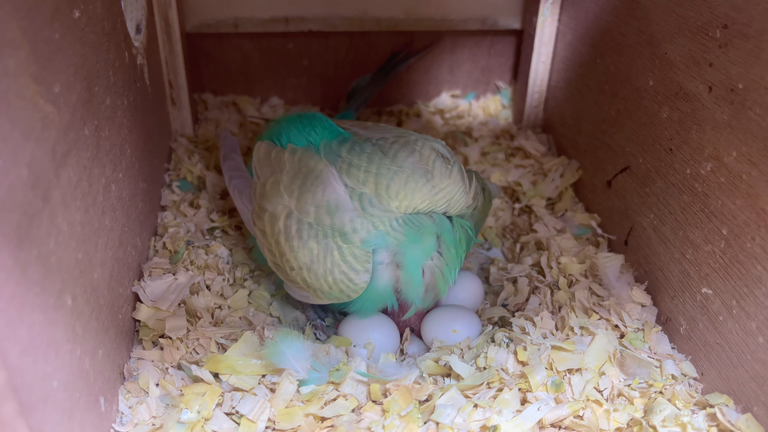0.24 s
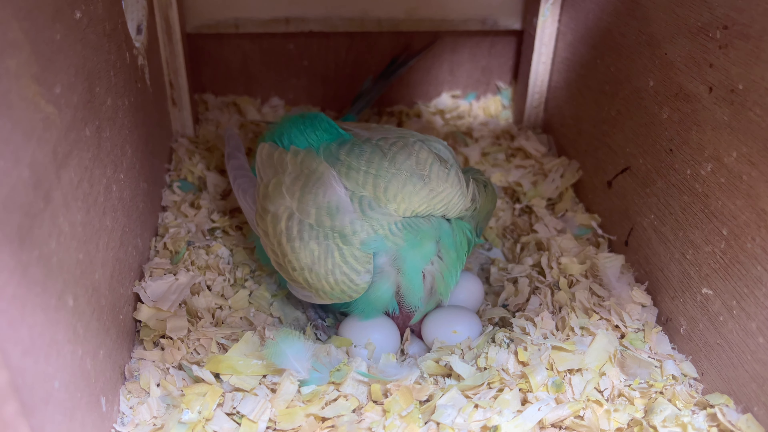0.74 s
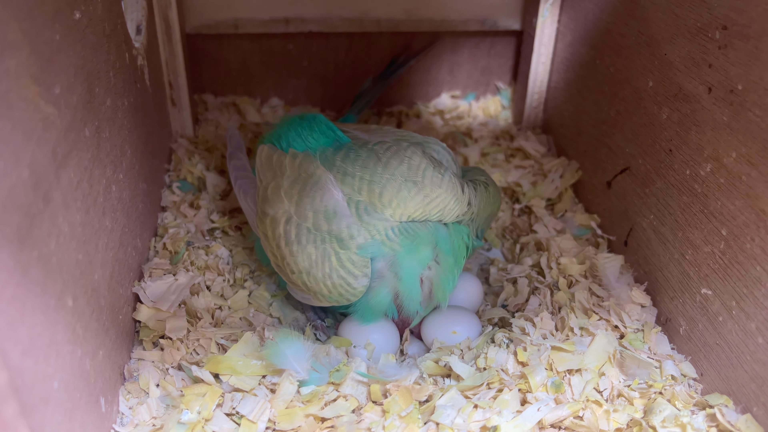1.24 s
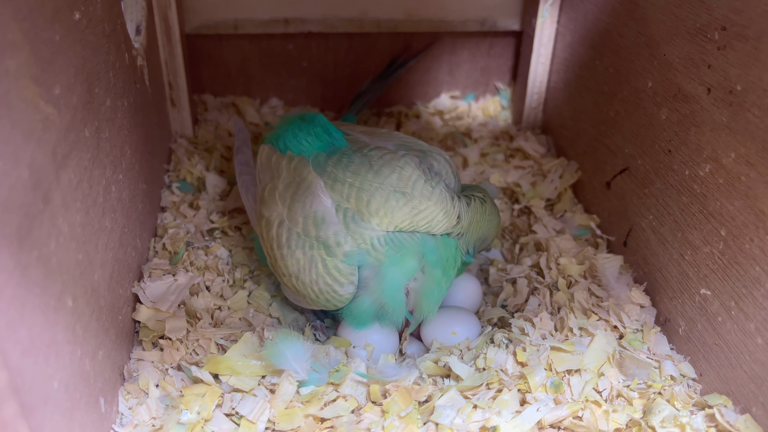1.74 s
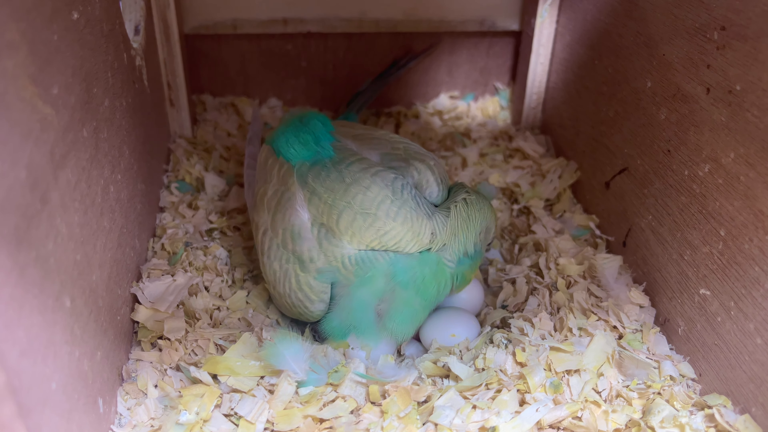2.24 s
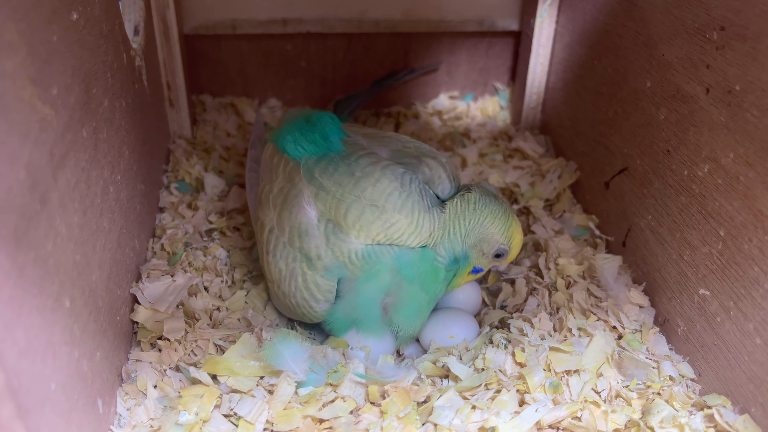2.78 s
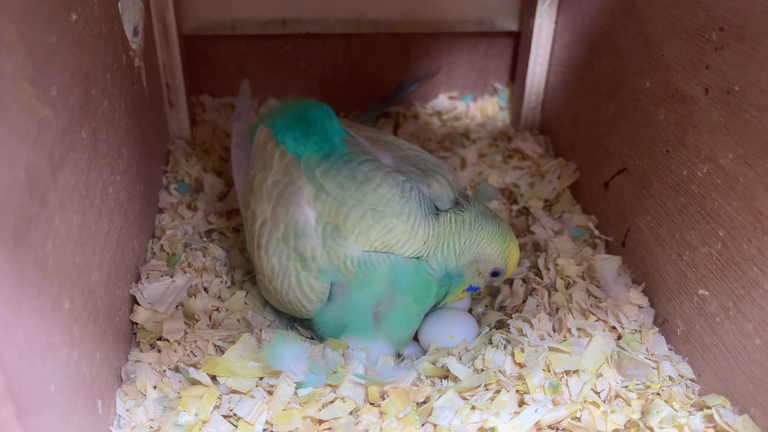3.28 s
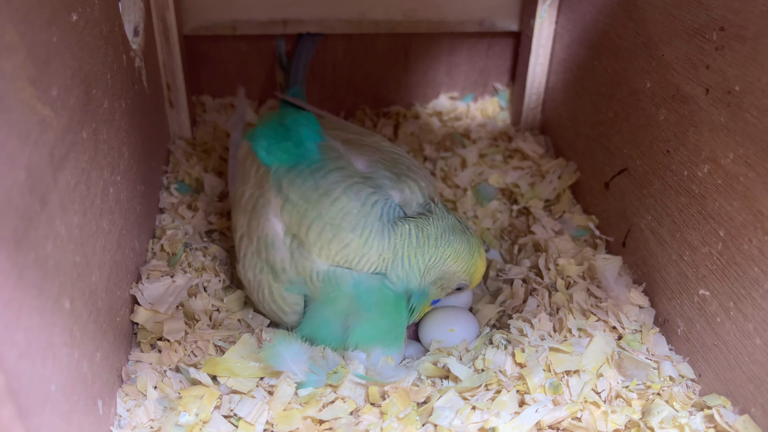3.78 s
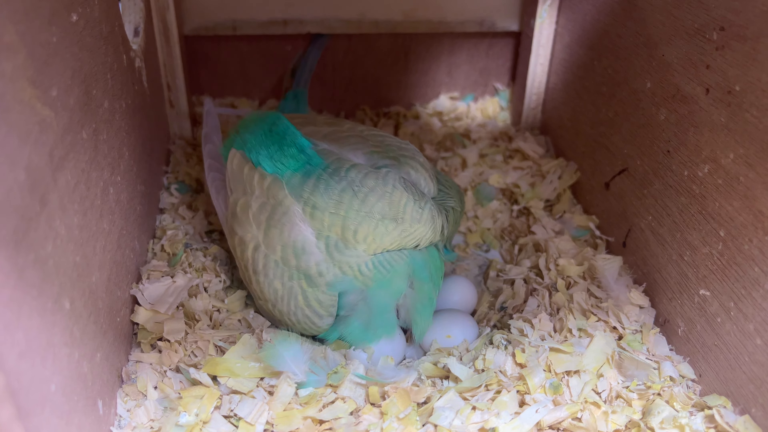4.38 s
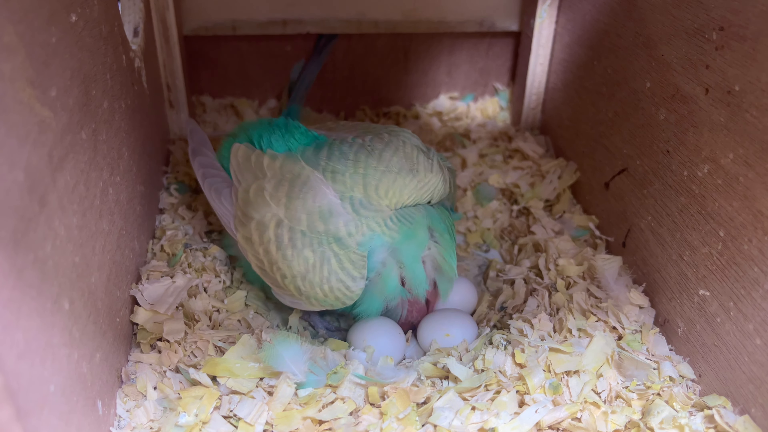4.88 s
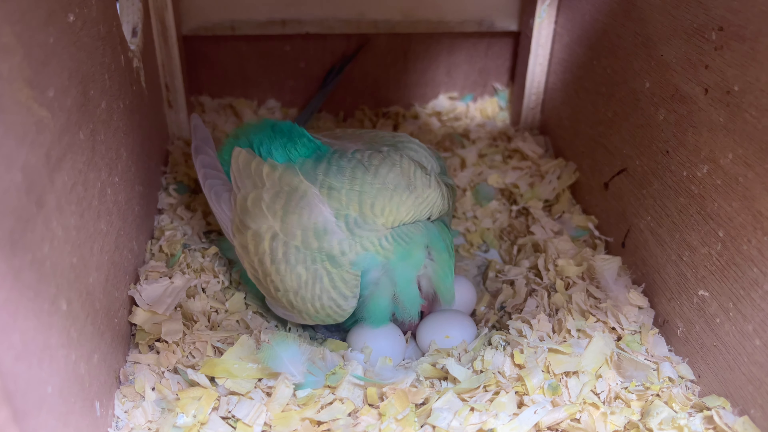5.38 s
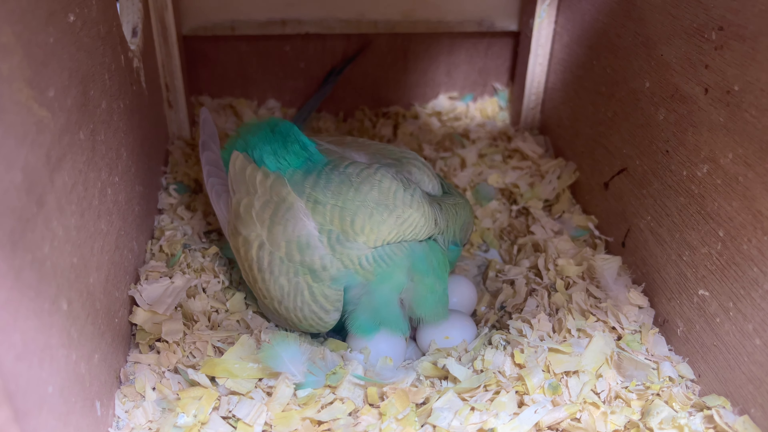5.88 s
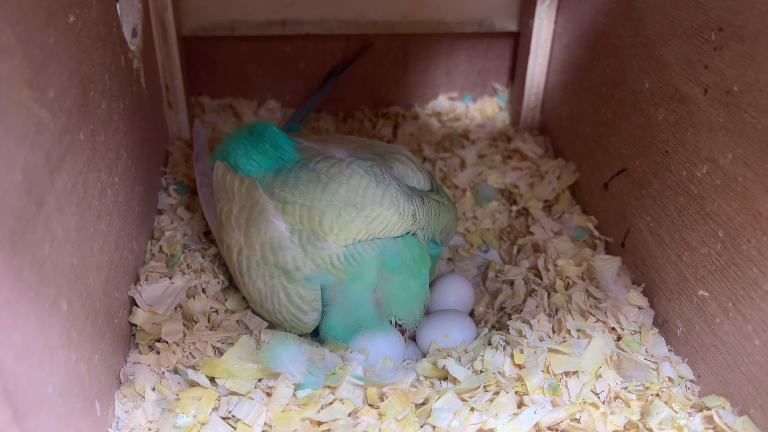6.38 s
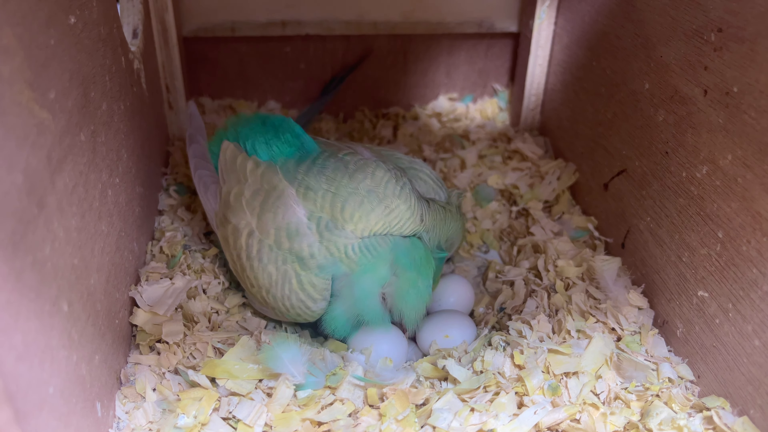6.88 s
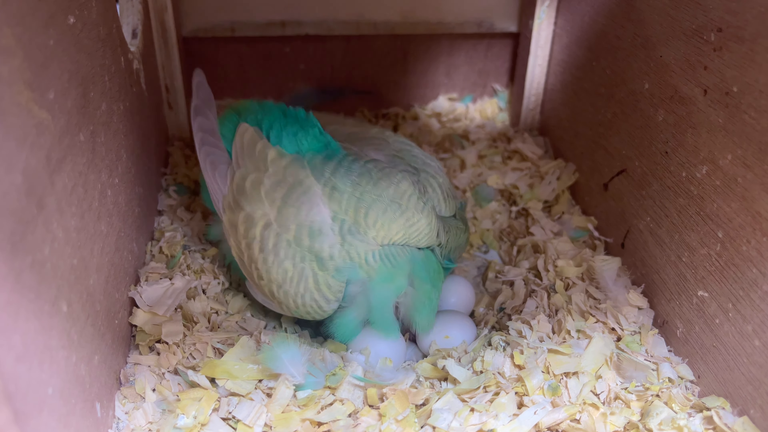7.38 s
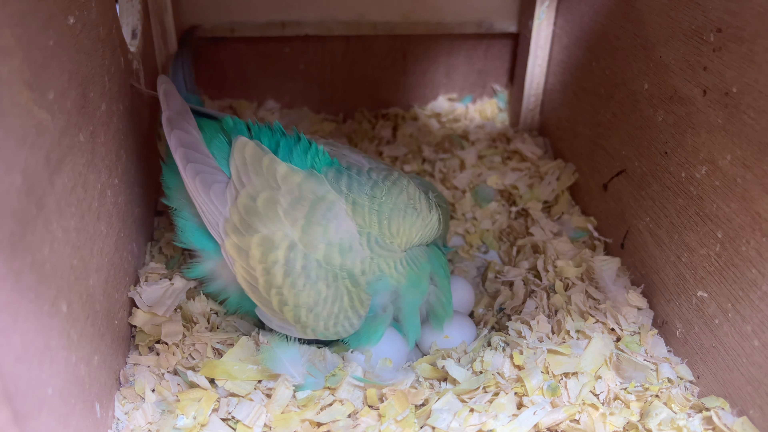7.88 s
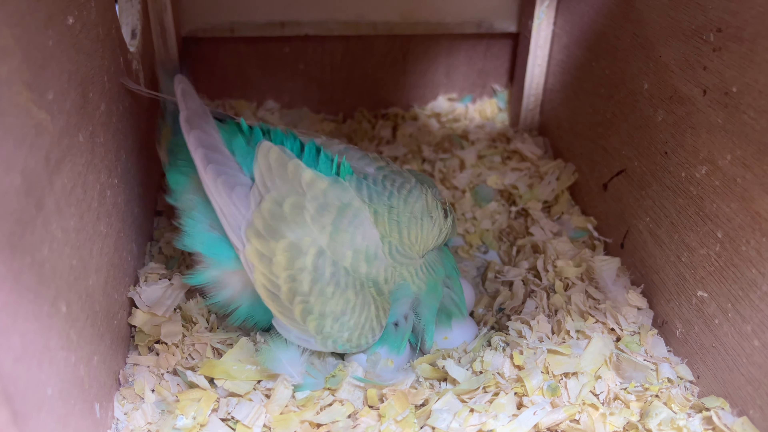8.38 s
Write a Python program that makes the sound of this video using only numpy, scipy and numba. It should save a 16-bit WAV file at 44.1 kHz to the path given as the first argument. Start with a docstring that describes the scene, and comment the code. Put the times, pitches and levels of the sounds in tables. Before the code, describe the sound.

Close stereo pickup inside a small wooden nest box: a small parrot scolds in rough, bright, nasal bursts while its movements make low shakes, wooden taps and scratchy shavings. Other birds whistle, chatter and peep faintly around it, with short box and aviary echoes. Two busy bouts of squawking are separated by a quiet pause, and the end drops to soft chatter, dull thumps and a last low rumble.

```python
"""Budgie squawks in a wooden nest box

A budgie close by rasps a run of harsh squawks: pulses and hiss ring two moving throat resonances.
Other birds in the aviary whistle, chatter and peep, made from gliding tones with overtones and breath.
Feet and beak tap the wood: short pushes ring panel resonances. Shaped noise makes the rustling shavings,
the bouts of low rumble that shake the box and the quiet air. Tails of fading noise make the echoes."""
import sys
import numpy as np
from scipy import signal
from scipy.fft import rfft, irfft, next_fast_len
from scipy.io import wavfile
from scipy.ndimage import uniform_filter1d, map_coordinates
from numba import njit

SR = 44100
rng = np.random.default_rng(int(sys.argv[2]) if len(sys.argv) > 2 else 0)


def unload_wav(signal):
    """Save mono or channel-first audio to the path in sys.argv[1] as 16-bit WAV at rate SR, clipped to [-1, 1]."""
    wavfile.write(
        sys.argv[1],
        SR,
        np.round(np.clip(np.atleast_2d(signal).T, -1, 1) * 32767).astype(np.int16),
    )


N = 380583

# colour of breathy bird noise: (frequency [Hz], relative level per Hz [dB])
BREATH_COLOUR = [(800, -77), (1300, -18), (2300, -16), (3500, -7.5), (4350, -13), (5300, -5.5), (7600, -9),
                 (8700, -4.5), (9900, -13), (11000, -1.5), (12000, -12.5), (13000, -27.5), (15000, -38.5),
                 (16500, -54)]


def amp(db):
    """Turn decibels into a gain."""
    return 10 ** (np.asarray(db) / 20)


def unit(x):
    """Scale x to an rms (average strength) of 1."""
    return x / np.sqrt(np.mean(x ** 2) + 1e-20)


def along(points, hz):
    """Read a curve of (frequency, value) points on a log frequency axis."""
    f, v = np.transpose(points)
    return np.interp(np.log(hz + 1), np.log(f + 1), v)


def curves(rows):
    """Give one value per sample for each column after the time."""
    s, *cols = np.transpose(rows)
    return [np.interp(np.arange(N) / SR, s, c) for c in cols]


def contour(rows, shape):
    """Gain over time: each row's shape starts at its time and is read for 1 s; the loudest wins."""
    t = np.arange(N) / SR
    out = np.zeros(N)
    for s, *rest in rows:
        i = round(s * SR)
        part = out[i:i + SR]
        out[i:i + SR] = np.maximum(part, shape(t[:len(part)], *rest))
    return out


def sounding(t0, t1, fade):
    """Give 1 between two times and 0 outside, with soft edges."""
    t = np.arange(N) / SR
    return np.clip(np.minimum(t - t0, t1 - t) / fade, 0, 1)


def wobble(rate):
    """A smooth random curve with this many random points a second."""
    knots = rng.standard_normal(int(N * rate / SR) + 4)
    return map_coordinates(knots, [np.arange(N) * rate / SR])


def filtered(x, response):
    """Change the strength and phase of x by a response that depends on frequency."""
    m = next_fast_len(N + SR // 2)
    return irfft(rfft(x, m) * response(np.fft.rfftfreq(m, 1 / SR)), m)[..., :N]


def steady(x):
    """Even out x to an rms of 1 over about every 30 ms."""
    return x / np.sqrt(np.abs(uniform_filter1d(x ** 2, size=1300)) + 1e-20)


def patchy(x, depth_db):
    """Give x random louder and softer patches in time and frequency."""
    z = signal.stft(x, nperseg=512)[2]
    field = uniform_filter1d(rng.standard_normal(z.shape[-2:]), size=6, axis=0)
    field = uniform_filter1d(field, size=8, axis=1)
    return signal.istft(z * amp(depth_db * unit(field)), nperseg=512)[1][..., :N]


def rush(spectrum, patchy_db):
    """Patchy coloured noise in two channels that share part of it, depending on frequency."""
    # (frequency [Hz], likeness of the two channels here, 1 = the same)
    likeness = [(60, 1), (250, 0.55), (1000, 0.033), (7000, 0.11), (9000, 0.93)]

    def colour(hz):
        angle = np.arccos(np.clip(along(likeness, hz), 0, 1)) / 2
        level = amp(along(spectrum, hz)) / (1 + (hz / 12500) ** 40)
        return level * [np.cos(angle), np.sin(angle)]

    mid, side = filtered(patchy(rng.standard_normal((2, N)), patchy_db), colour)
    return unit(np.array([mid + side, mid - side]))


def grains(often, size):
    """Smooth little bumps of random strength at random moments."""
    hits = (rng.random(N) < often) * rng.exponential(size=N)
    return np.convolve(hits, np.hanning(size), "same")


def quiet_air():
    """Steady soft noise, strongest in the bass."""
    # (frequency [Hz], relative level per Hz [dB])
    air_colour = [(30, -24.5), (95, -13.5), (118, 5), (145, -13), (267, -5), (571, -22.5), (1260, -14),
                  (1390, -15.5), (1750, -25), (1890, -23.5), (2490, -26.5), (4950, -35.5), (11700, -55.5),
                  (13000, -63.5)]
    return amp(-56) * rush(air_colour, patchy_db=4)


def aviary(x):
    """Echoes of box and aviary; each quarter second gets its own noise tail, as the birds move."""
    # (frequency [Hz], time for the aviary echo to fall by 60 dB [s])
    echo_times = [(500, 0.06), (3000, 0.26), (7000, 0.2), (13000, 0.011)]
    box_t60_s, aviary_db = 0.035, -8.5  # the aviary echo starts this far below the box echo
    out, step = np.zeros((2, N + SR)), SR // 4
    for i in range(0, N, step):
        hz, t, z = signal.stft(rng.standard_normal((2, SR // 4)), SR, nperseg=256)
        box_fade = amp(-60 * t / box_t60_s)
        aviary_fade = amp(aviary_db - 60 * t / along(echo_times, hz)[:, None])
        tail = signal.istft(z * (box_fade + aviary_fade), SR, nperseg=256)[1]
        wet = signal.fftconvolve(x[None, i:i + step], tail / np.linalg.norm(tail[0]), axes=1)
        out[:, i:i + wet.shape[1]] += wet
    return out[:, :N]


def rustle():
    """Shavings and the far flock: noise made grainy by random bumps."""
    # (time [s], relative level [dB])
    rustle_level = [(0.0, -69), (2.45, -46.5), (2.86, -59.5), (3.13, -46), (3.17, -35.5), (3.23, -42.5),
                    (3.27, -52.5), (3.68, -47.5), (4.95, -62.5), (5.53, -51), (5.74, -61.5), (6.32, -55.5),
                    (6.9, -53.5), (7.26, -41), (7.47, -33), (8.0, -63), (8.63, -50)]
    # (frequency [Hz], relative level per Hz [dB])
    rustle_colour = [(590, -13.5), (1000, -40.5), (1840, 1), (2100, -9.5), (2470, 1), (2950, -6),
                     (4110, -7), (5360, -5.5), (8610, -10.5), (10100, 3.5), (14000, -26.5)]
    noise = (1 + .5 * grains(.003, size=90)) * rush(rustle_colour, patchy_db=4)
    return amp(curves(rustle_level)[0] - 1.5) * unit(noise)


def rumble():
    """Shaking in bouts: the box booms at the bottom, its panels sound above, and shavings are stirred; a faint
    low hum also sounds at the start and near 4.6 s."""
    # bouts: (time [s], length [s], relative level [dB], panels relative to the boom [dB]); the faint rows at 0
    # s and 4.6 s are a low hum, not shaking
    bouts = [(0, 0.7, -58, 4), (1.323, 0.29, -34.5, -4), (1.688, 0.36, -34.5, -3), (1.893, 0.23, -29.5, -5),
             (2.123, 0.16, -32, -10.5), (2.43, 0.054, -35.5, -10), (2.972, 0.35, -38.5, 3.5),
             (3.419, 0.086, -38.5, -1.5), (3.979, 0.094, -47.5, -1.5), (4.6, 0.77, -56, 1),
             (5.128, 0.281, -49, 4), (5.885, 0.23, -46.5, 11.5), (7.084, 0.3, -37, 3.5),
             (7.654, 0.38, -35, -7), (8.464, 0.23, -35.5, -2)]
    # (frequency [Hz], relative level per Hz [dB])
    rumble_colour = [(30, 1), (58, 6.5), (85, 1), (140, -0.5), (244, -11.5), (419, -18.5), (470, -10),
                     (600, -26.5), (1100, -42.5), (1600, -120)]
    # stirred shavings: (frequency [Hz], relative level per Hz [dB])
    litter_colour = [(120, -20), (250, -8.5), (480, -5.5), (620, -5), (850, 3.5), (1100, -53.5)]
    rise_s, fade_db_per_s, calm_db, split_hz = 0.033, 295.5, -58, 67

    def bout(t, length, db):
        return np.clip(t / rise_s, 0, 1) * amp(db - fade_db_per_s * np.clip(t - length, 0, None))

    boom_rows = [(s, length, db) for s, length, db, _ in bouts]
    panel_rows = [(s, length, db + panel_db) for s, length, db, panel_db in bouts]
    boom_level = np.maximum(contour(boom_rows, bout), amp(calm_db))
    panel_level = np.maximum(contour(panel_rows, bout), amp(calm_db))
    noise = unit(amp(2.5 * wobble(25)) * rush(rumble_colour, patchy_db=1.5))
    deep = filtered(noise, lambda hz: 1 / (1 + (hz / split_hz) ** 6))
    crumbs = 1 + .5 * grains(.006, size=250)
    litter = amp(-17.5) * unit(crumbs * rush(litter_colour, patchy_db=4.0))
    return boom_level * deep + panel_level * (noise - deep) + panel_level * litter


def tone(hz, overtone_db, rough):
    """A whistle with a second harmonic; pitch and level flutter fast."""
    turn = 2 * np.pi * np.cumsum(hz * (1 + rough * wobble(300))) / SR
    return np.sqrt(2) * amp(3 * wobble(120)) * (np.sin(turn) + amp(overtone_db) * np.sin(2 * turn))


def peeps():
    """One small bird repeats a two-arched peep with a strong second harmonic; low notes are breathier."""
    # turning points of one peep's pitch: (time from the first crest [s], frequency [Hz])
    arches = np.array([(-.065, 4200), (-.031, 3650), (0, 5500), (.045, 3850), (.077, 5620), (.13, 2700)])
    # (first crest time [s], start and end from that crest [s], relative level [dB], relative breath [dB])
    peep_rows = [(0.467, -0.059, 0.15, -48.5, 2), (1.277, -0.057, 0.115, -51.5, 1),
                 (2.064, 0.048, 0.13, -60, -5), (2.982, -0.074, 0.0032, -56, 1.5),
                 (3.797, -0.034, 0.11, -50.5, 1), (4.643, -0.062, 0.14, -54, 4),
                 (6.267, -0.068, 0.051, -52, 7), (7.948, -0.046, 0.15, -52.5, 3.5)]
    s, turns_hz = np.vstack([arches + [p[0], 0] for p in peep_rows]).T
    place = np.interp(np.arange(N) / SR, s, np.arange(len(s)))
    eased = np.floor(place) + np.sin(np.pi / 2 * (place % 1)) ** 2  # half cosines join the points
    hz = np.interp(eased, np.arange(len(s)), turns_hz)
    level, airy, faded = np.zeros(N), np.zeros(N), np.zeros(N)
    for crest, begin, end, db, breath_db in peep_rows:
        level += amp(db) * sounding(crest + begin, crest + end, fade=0.016)
        airy += amp(breath_db) * sounding(crest - .1, crest + .2, fade=.01)
        # the tone fades between the arches and on the last fall
        faded += sounding(crest + .024, crest + .062, fade=.012)
        faded += .95 * sounding(crest + .097, crest + .17, fade=.02)
    clear = 1 - .87 * faded

    def breath_colour(f):
        return amp(along(BREATH_COLOUR, f)) / (1 + (f / 11500) ** 20) / (1 + (3000 / (f + 1)) ** 4)

    breath = unit(patchy(filtered(rng.standard_normal(N), breath_colour), 3.0))
    broken = amp(3.5 * wobble(70)) * (hz / 5000) ** 1.5  # uneven, and stronger on high notes
    leak = airy / (1 + (hz / 5000) ** 12) * amp(2.5 * wobble(40))
    return level * (clear * broken * tone(hz, overtone_db=3.7, rough=0.0069) + leak * breath)


def gliding_notes(notes, second_db, third_db):
    """Short gliding notes with a quick swell and two overtones; a hoarse flutter spreads each pitch."""
    out = np.zeros(N + SR)
    for s, length, from_hz, to_hz, db in notes:
        u = np.arange(round(length * SR)) / (length * SR)  # 0 to 1 through the note
        waver = np.interp(u, np.linspace(0, 1, num=8), rng.standard_normal(8))
        hz = (from_hz + (to_hz - from_hz) * (1 - (1 - u) ** 1.472)) * (1 + 0.0333 * waver)
        turn = 2 * np.pi * np.cumsum(hz) / SR
        voice = np.sin(turn) + amp(second_db) * np.sin(2 * turn) + amp(third_db) * np.sin(3 * turn)
        out[round(s * SR):][:len(u)] += amp(db + 6.0) * np.sin(np.pi * u) ** 0.22 * voice
    return out[:N] * (1 + .5 * wobble(350) + .35 * wobble(1400))


def chatter():
    """Clear notes have weak overtones; reedy notes have strong ones."""
    # both: (time [s], length [s], start pitch [Hz], end pitch [Hz], relative level [dB]); the short 5 kHz note
    # at 3.176 s is a small scratch, not a call
    clear_notes = [(0.665, 0.167, 1193, 1310, -63), (1.694, 0.13, 1272, 1316, -52.5),
                   (2.21, 0.028, 1222, 1334, -47.5), (2.389, 0.012, 3690, 2434, -45),
                   (2.407, 0.043, 2260, 2163, -45.5), (2.577, 0.012, 3101, 2550, -43),
                   (3.455, 0.043, 2614, 2616, -43.5), (3.475, 0.014, 2100, 1288, -50),
                   (3.509, 0.017, 2354, 2105, -44.5), (3.515, 0.044, 1250, 1220, -50.5),
                   (3.785, 0.013, 4330, 3300, -52), (3.176, 0.023, 5000, 4840, -47.5),
                   (5.365, 0.015, 3530, 3785, -35.5), (5.389, 0.064, 3005, 2670, -35),
                   (5.422, 0.015, 3570, 3270, -31), (5.472, 0.015, 1450, 1504, -56),
                   (6.192, 0.038, 2240, 2590, -54.5), (6.227, 0.025, 2420, 2670, -47.5),
                   (6.237, 0.03, 1801, 1950, -51), (6.263, 0.0076, 3300, 3170, -42),
                   (6.269, 0.05, 2690, 2295, -42), (7.404, 0.022, 2630, 2390, -42.5),
                   (7.424, .014, 2700, 3280, -35), (7.44, .04, 3420, 3910, -36.5),
                   (8.172, 0.03, 3100, 2830, -51), (8.186, 0.034, 2270, 2270, -47.5),
                   (8.202, 0.043, 2774, 2910, -42.5), (8.223, 0.022, 4000, 3470, -40.5),
                   (8.242, 0.026, 2003, 1267, -51.5), (8.258, 0.017, 3320, 3198, -35.5),
                   (8.273, 0.035, 2781, 2506, -37.5), (8.314, 0.018, 2453, 2380, -38),
                   (8.317, 0.025, 1420, 1180, -55.5)]
    reedy_notes = [(0.661, 0.1, 2224, 2240, -60), (.925, 0.02, 2910, 3240, -65),
                   (.96, 0.028, 3146, 3020, -65), (0.979, 0.023, 3320, 3900, -63),
                   (1.013, 0.02, 2750, 2566, -59), (4.412, 0.054, 2990, 3080, -63),
                   (4.474, 0.017, 4100, 3880, -63), (4.5, 0.032, 2940, 3010, -62),
                   (5.396, 0.015, 1460, 3000, -42.5), (5.492, 0.026, 1420, 3352, -40.5),
                   (5.62, 0.016, 997, 2510, -46)]
    clear = gliding_notes(clear_notes, second_db=-25, third_db=-34)
    return clear + gliding_notes(reedy_notes, second_db=-5, third_db=-22)


def whistles():
    """Long rising and falling warbles: tones that follow drawn pitch and level curves."""
    # one list per whistle: (time [s], pitch [Hz], relative level [dB])
    warbles = [
        [(3.555, 1676, -44), (3.59, 1767, -41.5), (3.615, 1690, -45), (3.64, 1354, -41.5), (3.66, 1830, -48),
         (3.7, 2200, -57), (3.73, 2240, -49.5), (3.765, 2765, -45), (3.795, 1710, -47.5), (3.815, 1690, -58)],
        [(3.865, 1630, -59), (3.91, 1370, -43), (3.93, 1703, -52.5), (4.0, 1750, -47.5)],
        [(5.08, 948, -56.5), (5.13, 1011, -62), (5.19, 1276, -52.5), (5.225, 1626, -58), (5.25, 2280, -61),
         (5.28, 1950, -66)],
    ]
    hz, db = curves(np.vstack(warbles))
    on = sum(sounding(w[0][0], w[-1][0], fade=0.0012) for w in warbles)
    return on * amp(db - 1.5 + 1.5 * wobble(45)) * tone(hz, overtone_db=-13, rough=.025)


def knocks():
    """Taps ring the wooden panels with a short crack; dull bumps push the box at one low pitch."""
    # (time [s], relative level [dB], crack relative to that [dB], contact time [ms])
    taps = [(2.64, -21, -34, 0.8), (2.647, -4, -45, 1.56), (3.131, -13, -8.5, 0.8), (3.213, -23, -3, 1.34),
            (4.988, -42.5, 0.5, 0.092), (5.131, -54, 9, .1)]
    # (time [s], level [dB], pitch [Hz], relative level of the octave above [dB])
    thumps = [(2.024, -16, 85.05, 3), (2.425, -20, 76, -11), (3.453, -17.5, 106, -6.5),
              (8.101, -27, 88, -8.5), (8.301, -31, 78, -13.5)]
    # panel resonances: (frequency [Hz], width [Hz], relative level [dB])
    panels = [(345, 30.67, 3), (814, 44, 8.5), (1470, 920, 8), (2550, 780, 20)]
    blows, cracks, bumps = np.zeros(N), np.zeros(N + SR), np.zeros(N + SR)
    t = np.arange(SR // 5) / SR
    for s, db, crack_db, contact_ms in taps:
        i = round(s * SR)
        push = np.sin(np.pi * np.clip(1000 * t / contact_ms, 0, 1)) ** 2
        blows[i:][:len(t)] += amp(db + 21.0) * push / push.sum()
        crack_level = amp(db + crack_db + 3.0 - 60 * t / 0.022)  # falls 60 dB in 22 ms
        cracks[i:][:len(t)] += crack_level * rng.standard_normal(len(t))
    for s, db, hz, octave_db in thumps:
        level = amp(db - 60 * t / 0.051) * np.clip(t / 0.0024, 0, 1)
        octave = amp(octave_db - 60 * t / 0.11) * np.sin(2 * np.pi * 2.0 * hz * t)
        bumps[round(s * SR):][:len(t)] += level * (np.sin(2 * np.pi * hz * t) + octave)

    def wood(f):
        rings = 0
        for k, (centre, width, db) in enumerate(panels):  # neighbours ring in opposite directions
            rings = rings + (-1) ** k * amp(db) * 1j * f * width / (centre ** 2 - f * f + 1j * f * width)
        return rings / (1 + 1j * f / 1800) ** 2  # softened treble

    def bright(f):
        return (1j * f * 6000 / (5500 ** 2 - f * f + 1j * f * 6000)) ** 2 / (1 + 1j * f / 11000) ** 3

    return bumps[:N] + filtered(blows, wood) + filtered(cracks[:N], bright)


@njit
def resonance(x, hz, width_hz, sr):
    """Ring x at a moving pitch: each sample feeds back the two before it."""
    y = np.zeros(len(x))
    r = np.exp(-np.pi * width_hz / sr)
    for i in range(2, len(x)):
        y[i] = x[i] + 2 * r * np.cos(2 * np.pi * hz[i] / sr) * y[i - 1] - r * r * y[i - 2]
    return y


def squawks():
    """The syrinx snaps shut in nearly even pulses and hisses once a cycle; two throat resonances ring."""
    # the first three are from far off; the long cry near the end is a chain of six
    # (time [s], crest after it [s], release after it [s], relative crest level [dB], pulse rate [per s],
    #  lower resonance [Hz], upper resonance at the crest [Hz], lower resonance [dB], breath [dB])
    calls = np.array([(0.277, 0.004, 0.094, -57, 176, 2050, 6250, -1, 4.5),
                      (0.659, 0.15, 0.18, -58.5, 140, 2440, 4430, 6, 0),
                      (0.928, 0.12, 0.11, -53.5, 77, 3030, 5900, 3.5, -0.5),
                      (1.395, 0.021, 0.09, -15.5, 160, 3860, 6290, -11, -9),
                      (1.573, 0.052, 0.11, -15.5, 167, 3825, 6330, -5, -9.5),
                      (1.764, 0.032, 0.11, -15, 158, 3800, 6480, -8, -10),
                      (1.973, 0.038, 0.12, -19, 148, 3260, 5807, -6.5, -21.5),
                      (2.235, 0.037, 0.11, -14, 155, 3570, 5790, -5.5, -7.5),
                      (2.448, 0.036, 0.08, -18, 153, 3930, 6020, -3.5, -1),
                      (2.668, 0.03, 0.067, -19.5, 220, 4070, 6100, -9.5, -9.5),
                      (2.97, 0.023, 0.063, -14.5, 144, 4320, 6286, -15, -6.5),
                      (3.36, 0.022, 0.071, -15.5, 274, 3338, 5920, -8.5, -11.5),
                      (3.545, 0.039, 0.062, -15, 193, 4820, 6350, -10, -6.5),
                      (4.005, 0.044, 0.085, -18.5, 194, 3920, 6220, -3, 0),
                      (5.31, 0.026, 0.05, -16, 170, 3120, 6170, -9.5, -22.5),
                      (5.397, 0.01, 0.029, -13, 210, 3320, 6300, -22, -20),
                      (5.506, 0.011, 0.039, -21.5, 186, 3300, 5920, -5.5, -12),
                      (6.034, 0.03, 0.039, -19.5, 217, 3700, 6210, -14, 4),
                      (6.306, 0.026, 0.13, -18, 160, 3430, 5970, -11.5, -6.5),
                      (6.572, 0.026, 0.098, -16, 181, 3600, 6100, -15, -2),
                      (6.775, 0.018, 0.11, -15.5, 153, 3770, 5940, -12, -4.5),
                      (6.991, 0.032, 0.086, -13.5, 155, 3770, 6230, -11, -5),
                      (7.146, 0.073, 0.18, -14, 163, 3755, 6060, -10.5, -6.5),
                      (7.326, 0.0269, 0.14, -22, 159, 3945, 5080, -4, -1),
                      (7.443, 0.018, 0.083, -21, 219, 3806, 6600, 0, -3.5),
                      (7.499, 0.013, 0.1, -22.5, 222, 4100, 6700, -3.5, 0),
                      (7.575, 0.024, 0.058, -20.5, 181, 3400, 6540, 1, -4),
                      (7.613, 0.01, 0.047, -19, 190, 3893, 6300, -3.5, -8),
                      (7.76, 0.064, 0.11, -15.5, 129, 3660, 5750, -10, -3)])
    attack_s, swell_db, sag_db_per_s, release_db_per_s = 0.009, 8, 86.5, 1296
    lead_s, lead_db = .014, -24.5  # a faint rasp runs ahead of each squawk
    climb_octaves_per_s = 0.49  # the upper resonance creeps up as the beak opens
    shrill_db = -34  # the top treble is weakened where the level contour is below this

    def effort(t, crest, release, db):
        """A squawk jumps up, swells to its crest, sags and is let go."""
        swell = swell_db * np.clip(1 - t / crest, 0, 1)
        sag = sag_db_per_s * np.clip(t - crest, 0, None)
        let_go = release_db_per_s * np.clip(t - release, 0, None)
        return np.clip(t / attack_s, 0, 1) ** 2 * amp(db - swell - sag - let_go)

    level = contour(calls[:, :4], effort)
    level = np.maximum(level, amp(lead_db) * np.roll(level, -round(lead_s * SR)))
    t = np.arange(N) / SR
    current = calls[np.searchsorted(calls[1:, 0], t + lead_s)]
    start, crest, release, _, rate, low_hz, high_hz, low_db, breath_db = current.T
    high_hz = high_hz * 2 ** (climb_octaves_per_s * (np.clip(t - start, 0, release) - crest))

    cycle = np.cumsum(rate * (1 + .03 * wobble(150))) / SR
    snaps = (np.diff(np.floor(cycle), prepend=0) > 0) * amp(2 * wobble(200))
    puff = (.15 + np.exp(-3.5 * (cycle % 1))) * amp(2.5 * wobble(170))
    hiss = rng.standard_normal((3, N)) * puff
    # more hiss from the lower resonance to the upper one to the broad rasp
    source = unit(snaps) + [[1.6], [2], [3]] * unit(hiss)

    drift = 1 + .035 * wobble(40)  # the beak keeps moving, so the resonances wander
    low = resonance(resonance(source[0], low_hz * drift, 500., SR), low_hz * drift, 900., SR)
    high = resonance(resonance(source[1], high_hz * drift, 900., SR), high_hz * drift, 1350., SR)
    low, high = steady(low), steady(high)
    broad = patchy(filtered(source[2], lambda hz: amp(along(BREATH_COLOUR, hz))), 3.5)
    dull = filtered(broad, lambda hz: 1 / (1 + (hz / 12500) ** 30))
    broad = dull + (broad - dull) * np.clip(level / amp(shrill_db), 0, 1)
    voice = amp(low_db + 0.56 * wobble(45)) * low
    voice = voice + amp(-3.0 + 1.22 * wobble(45)) * high + amp(breath_db) * unit(broad)

    def treble(hz):
        return 1 / (1 + (8000 / (hz + 1)) ** 16) / (1 + (hz / 12800) ** 30)

    # multiplying the resonances adds sum tones in the treble
    sums = filtered(high * (low + .5 * high), treble)
    voice = voice + amp(-15) * steady(sums)
    # a tiny throat radiates no bass
    return filtered(level * amp(-6.5) * voice, lambda hz: (1j * hz / (1j * hz + 900)) ** 3)


def scene():
    """Add the sources and the echoes of squawks, knocks, whistles and chatter."""
    near, box = squawks(), knocks()
    others = whistles() + chatter()
    wet = aviary(amp(4.5) * near + amp(5.0) * others + amp(4.0) * box)
    return near + others + peeps() + box + wet + quiet_air() + rustle() + rumble()


def record(dry):
    """Two ports hear nearly the same high up, the left later in the treble; both ends are cut off."""
    # (frequency [Hz], phase by which the left port is late [radians])
    port_delay = [(60, -.4), (700, -.3), (1550, 2.0), (2150, 3.4), (3900, 6.5), (7750, 6.3), (9000, 7.4),
                  (11600, 11.8), (13800, 15.7), (14800, 18.7)]
    top_hz, bottom_hz = 16300, 38
    mid, side = (dry[0] + dry[1]) / 2, (dry[0] - dry[1]) / 2
    side = filtered(side, lambda hz: np.maximum(1 / (1 + (hz / 9000) ** 8), amp(-21.5)))

    def ports(hz):
        late = np.exp(.5j * along(port_delay, hz) * np.array([[-1], [1]]))
        return late * (hz < top_hz) / (1 + (bottom_hz / (hz + 1)) ** 8)

    return filtered(np.array([mid + side, mid - side]), ports)


dry = scene()
out = record(dry)
unload_wav(out)
```